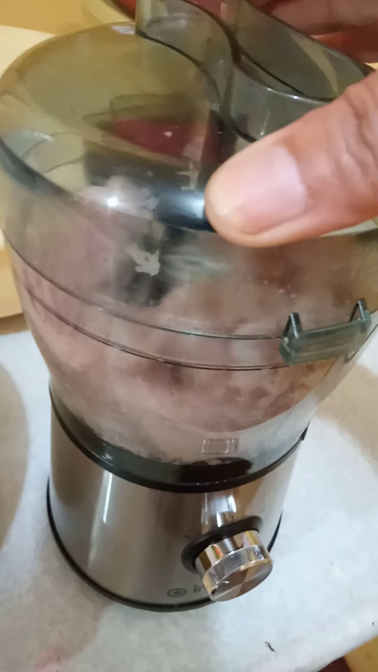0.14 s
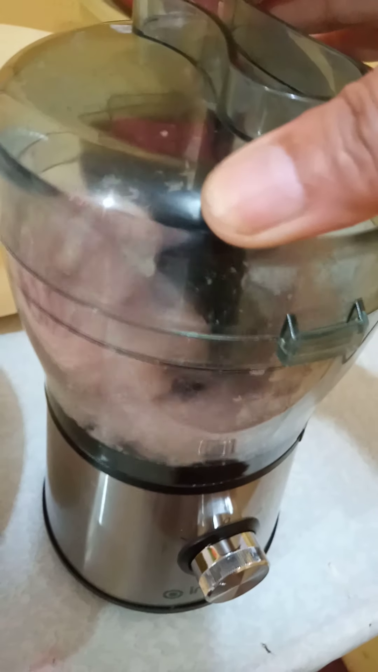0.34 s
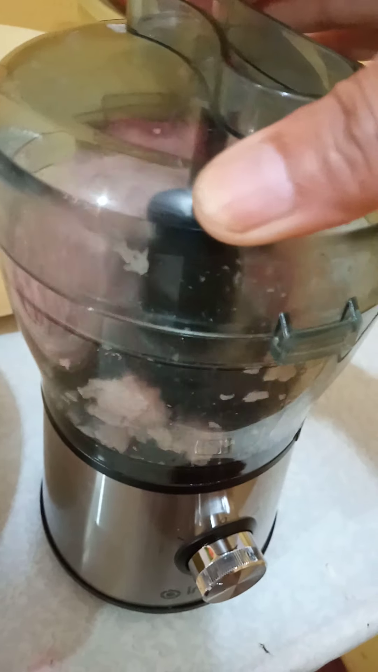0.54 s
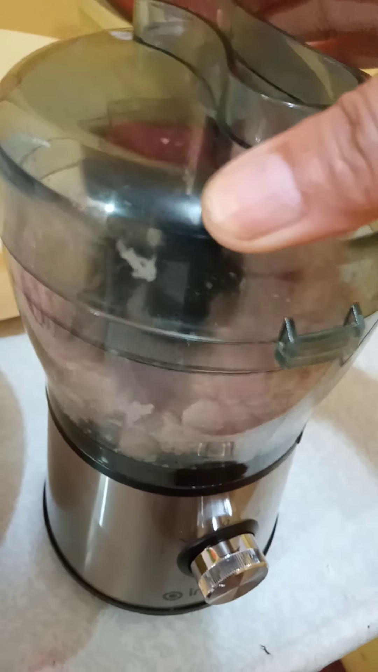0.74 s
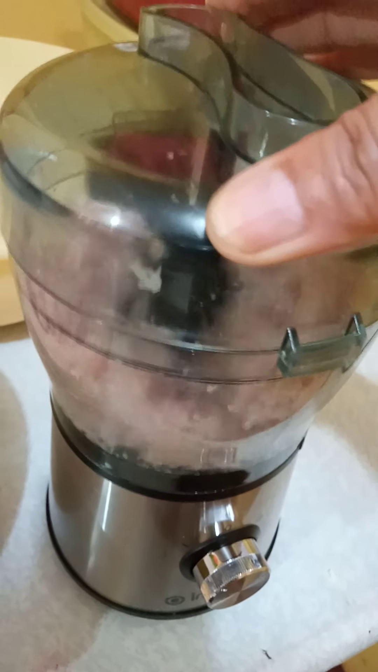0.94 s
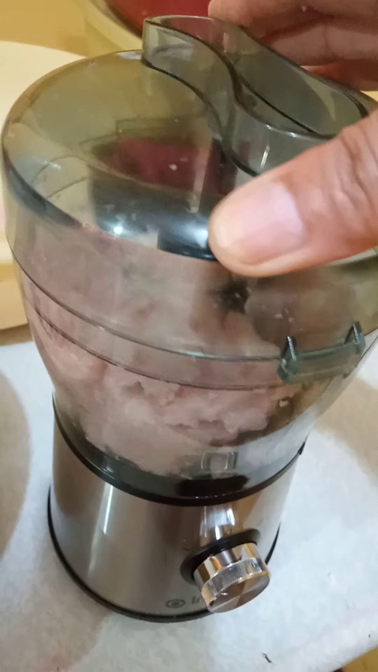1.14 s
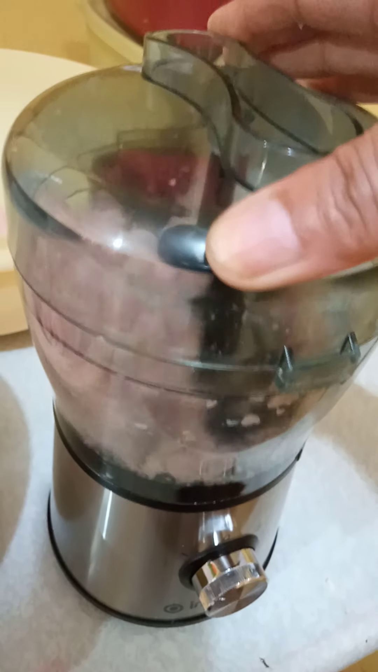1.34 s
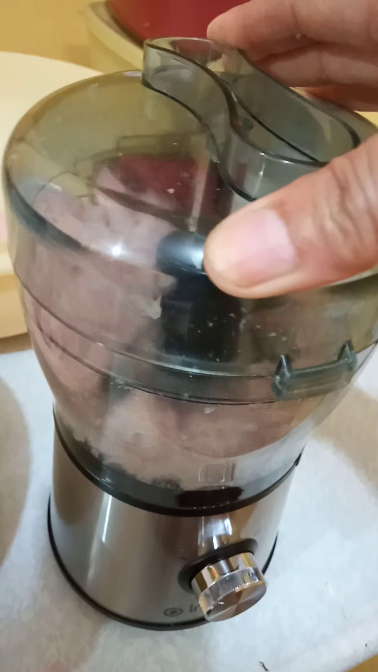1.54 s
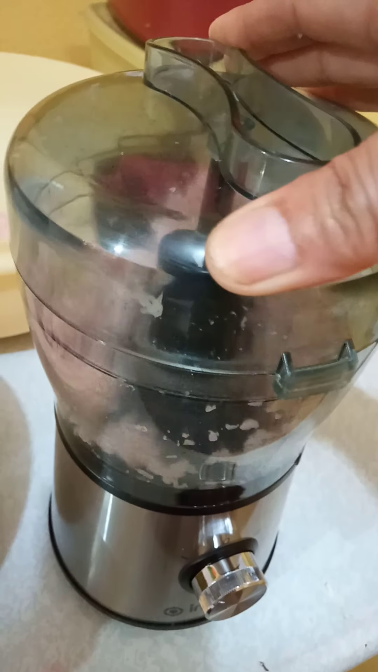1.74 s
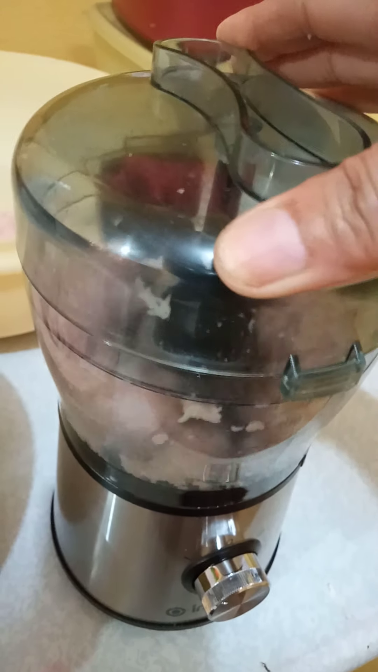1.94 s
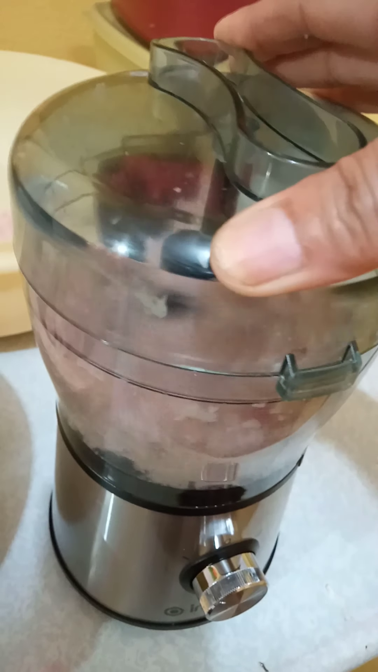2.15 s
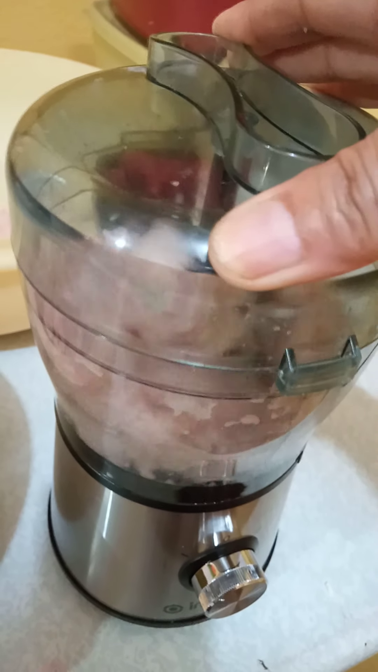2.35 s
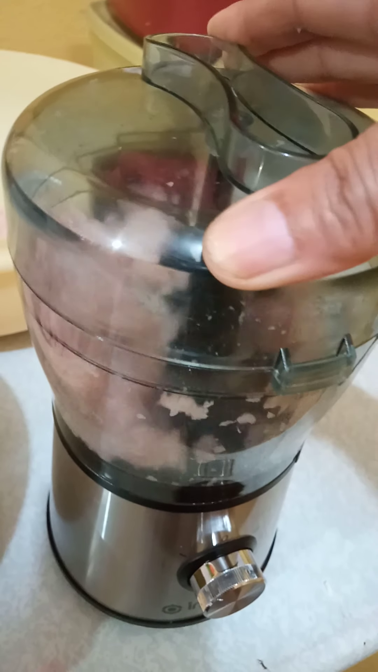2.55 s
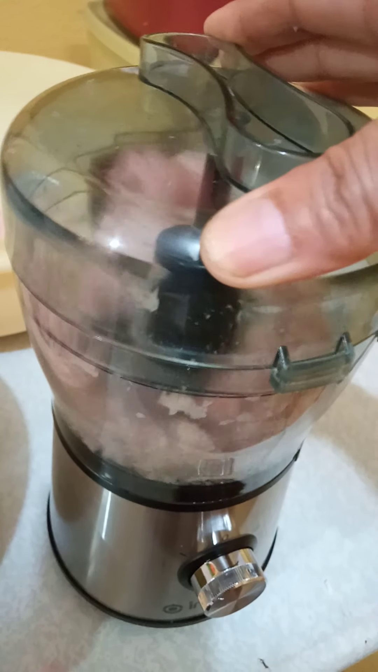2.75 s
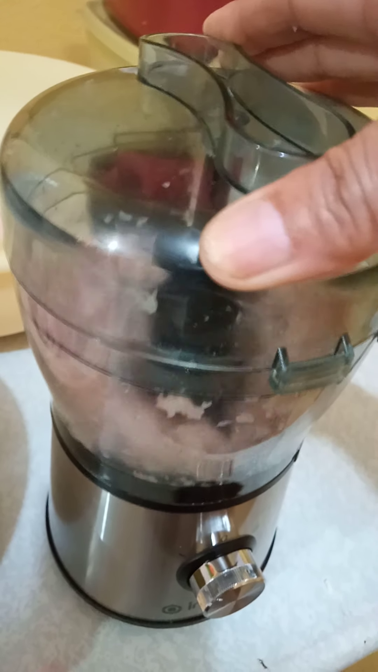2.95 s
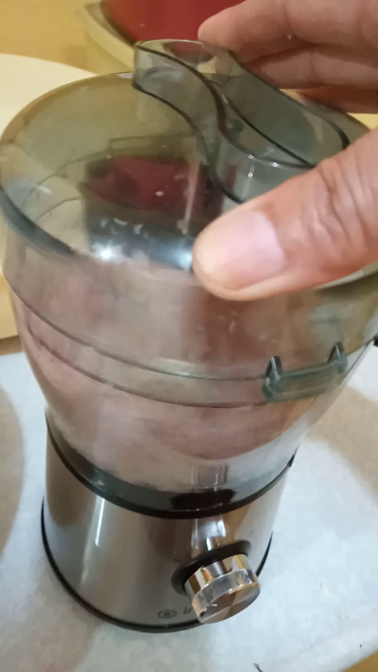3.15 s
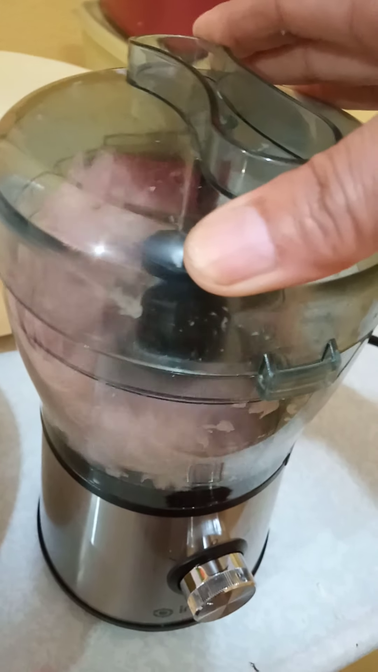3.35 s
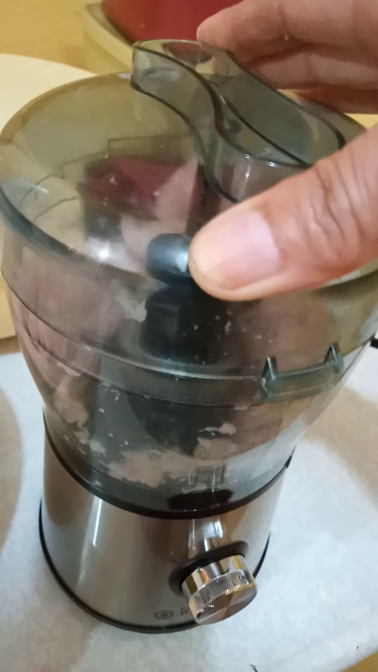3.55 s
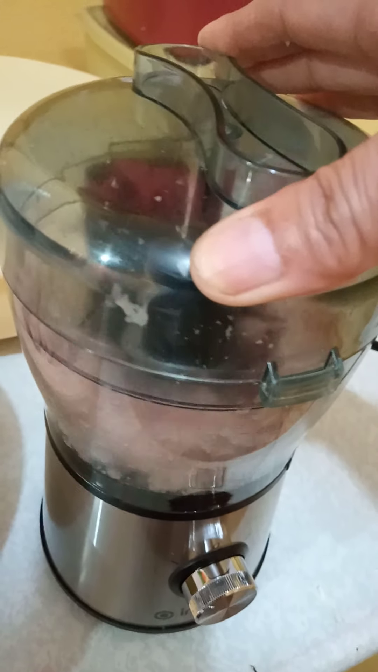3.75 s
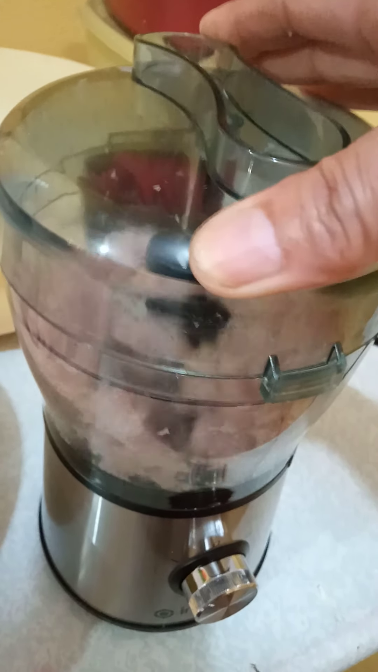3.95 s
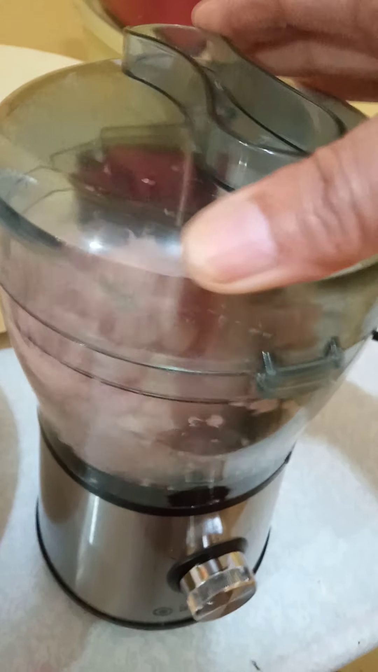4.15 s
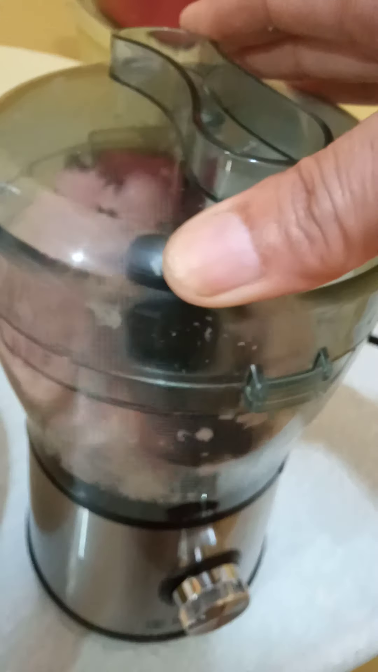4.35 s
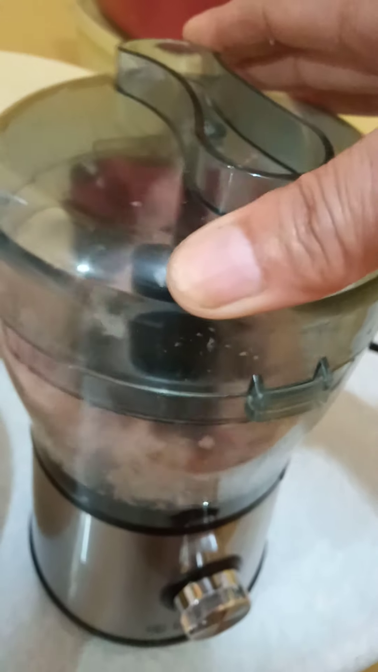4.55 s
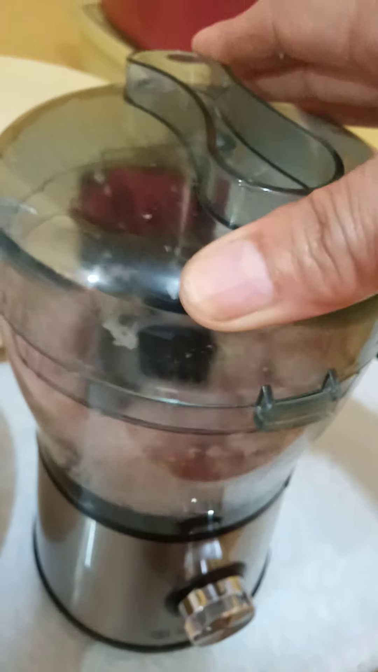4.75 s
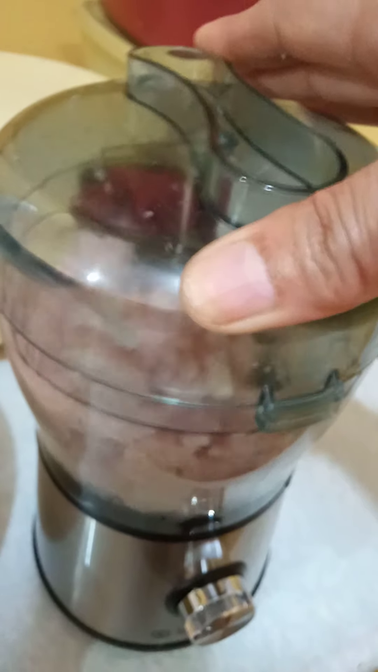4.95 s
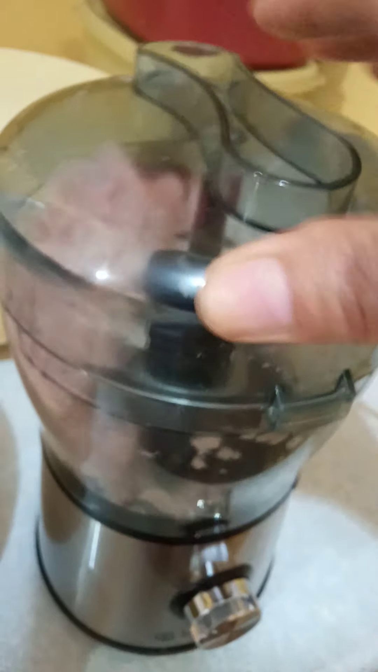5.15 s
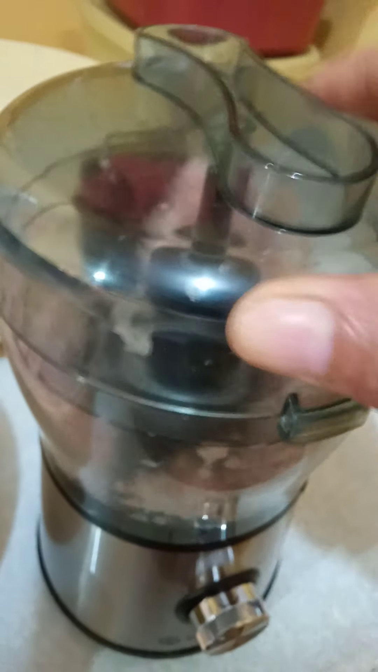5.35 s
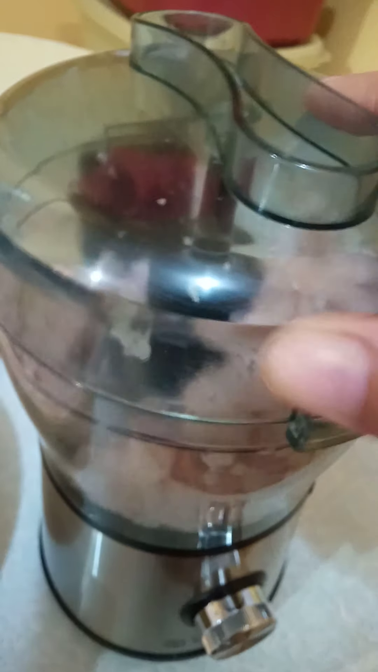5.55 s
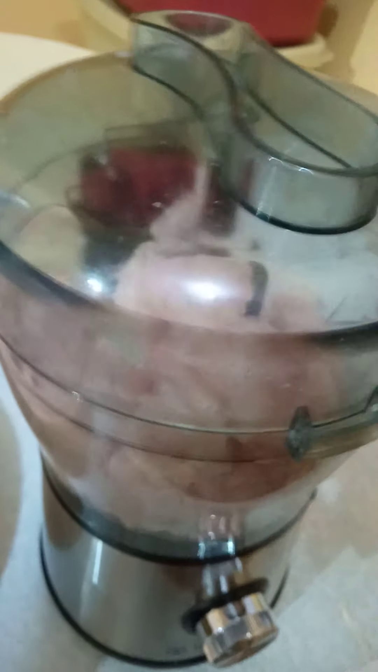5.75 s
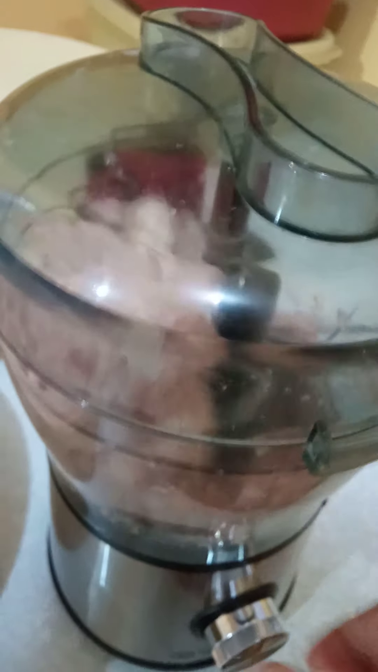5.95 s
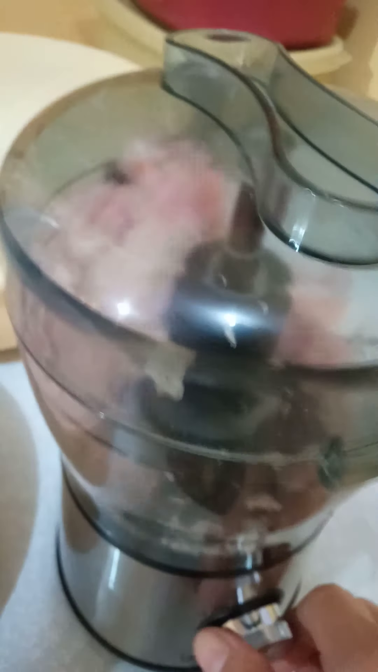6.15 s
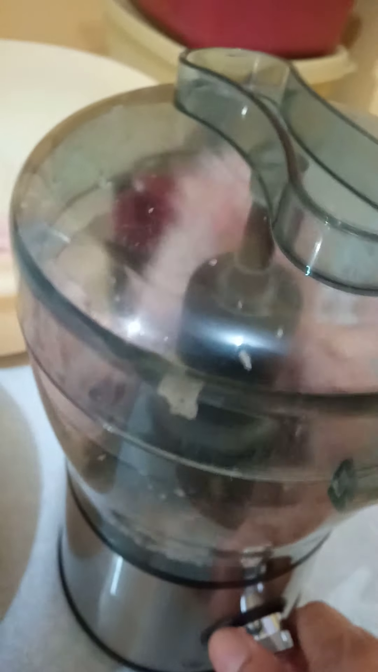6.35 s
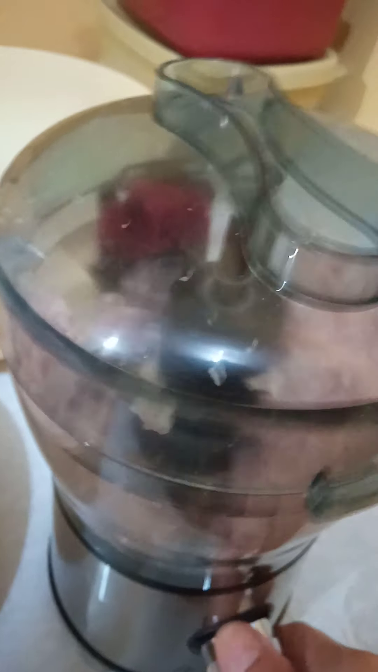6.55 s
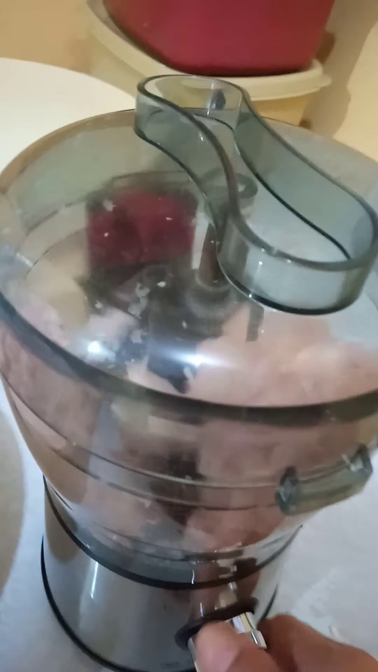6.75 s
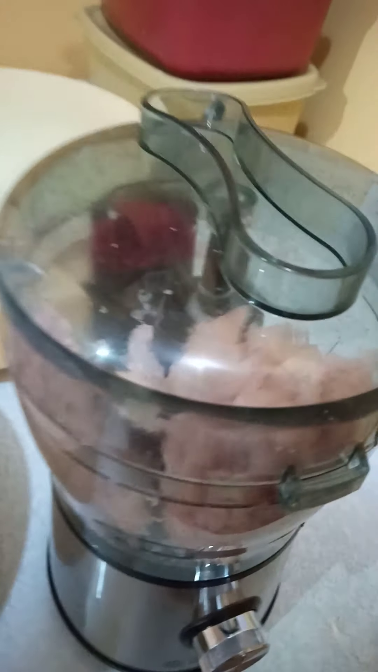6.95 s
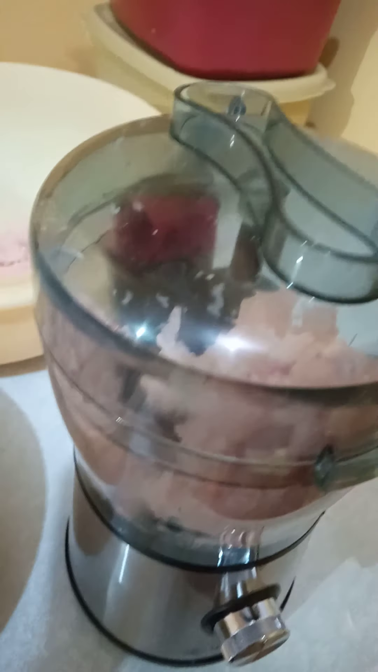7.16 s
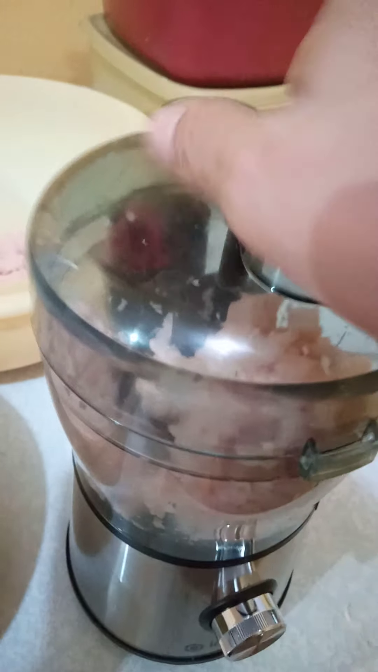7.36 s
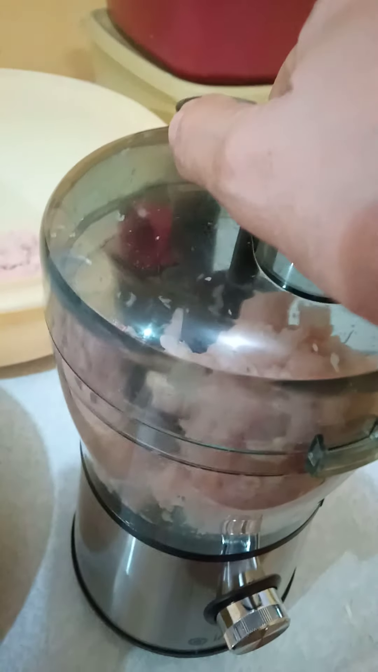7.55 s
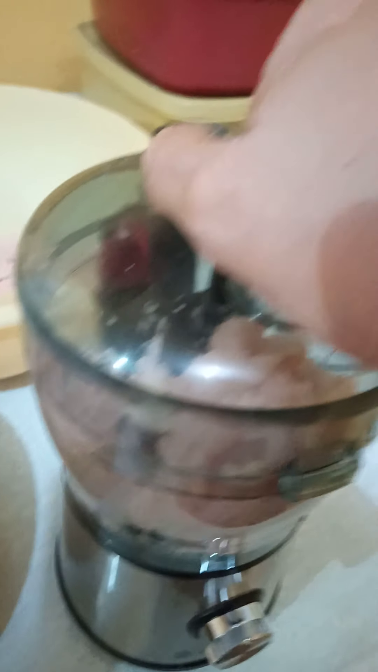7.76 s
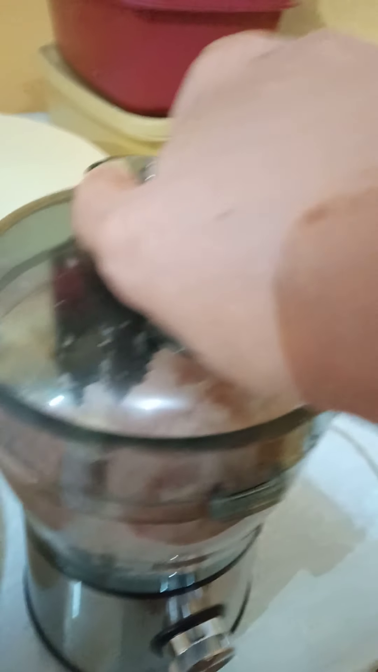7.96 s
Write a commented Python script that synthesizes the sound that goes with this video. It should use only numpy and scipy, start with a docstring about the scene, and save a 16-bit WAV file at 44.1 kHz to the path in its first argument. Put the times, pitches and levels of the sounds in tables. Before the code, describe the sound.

A food chopper whines and rasps as lumps of meat knock in its bowl, then coasts to a stop, followed by light plastic taps.

```python
"""Electric chopper mincing meat

A chopper minces raw meat on a kitchen counter, then is switched off and coasts to rest.
Its gear teeth whine and rasp through the plastic housing, throbbing with each turn of the blades.
The meat churns and lumps knock on the bowl. Afterwards a hand brushes and taps the lid,
over quiet room air and a faint steady hum."""
import sys
import numpy as np
from scipy import signal
from scipy.fft import rfft, irfft
from scipy.io import wavfile
from scipy.ndimage import uniform_filter1d, minimum_filter1d

SR = 44100
rng = np.random.default_rng(int(sys.argv[2]) if len(sys.argv) > 2 else 0)


def digitize_waveform(pressure):
    """Quantize a signal to 16-bit integers and store it at the path in sys.argv[1].

    Rows of a 2-D input are taken as channels; values are limited to [-1, 1].
    """
    field = np.atleast_2d(pressure).T
    bounded = np.clip(field, -1, 1)
    quanta = np.round(bounded * 32767).astype(np.int16)
    wavfile.write(sys.argv[1], SR, quanta)


N = 352344
TIME, BINS_HZ = np.arange(N) / SR, np.fft.rfftfreq(N, 1 / SR)
WHEEL_TEETH, IDLER_TEETH = 92, 90  # the wheel turns with the blades; the idler is a second gear
OFF_S, UNLOAD_S, COAST_S = 6.42, .05, .665  # switch-off, then time for teeth to go slack and to stop


# How well the plastic housing passes each pitch: pitch_hz, level_db
HOUSING_TONE = [(100, -34.5), (500, -19.5), (850, -12), (1150, -13), (1550, -3), (2550, -8.5), (3000, -2),
                (3500, 0.5), (4300, -6), (4640, -7.5), (4850, -22), (6000, -31.5), (8600, -41), (9800, -53),
                (15500, -70)]
# Pitches at which the housing rings: pitch_hz, width_hz, boost_db
HOUSING_RINGS = [(724.8, 33, 12.5), (1365, 23, 6.5), (1889.6, 135, 9.5), (2245, 90, 9), (3503, 44, 5),
                 (3670, 430, 5), (4450, 320, 0), (5300, 260, 8.5), (7310, 260, 7.5), (8230, 380, 10)]
def gears():
    """The whole drive: gear teeth rasp and whine while the motor's brushes fizz."""
    mesh_hz = mesh_rate()
    rasp_db, low_db, high_db = gear_levels(mesh_hz)
    teeth = np.cumsum(mesh_hz * (1 + .002 * drift(30))) / SR  # count of teeth that have met
    turns = teeth / WHEEL_TEETH
    housing = response(HOUSING_TONE, HOUSING_RINGS)
    coasting = np.clip(1.3 * (1 - mesh_hz / 1780), 0, 1)  # 0 at full speed, 1 when slow
    sound = amp(rasp_db) * rasp(teeth, turns, housing, coasting)
    # play between the teeth shakes their timing and blurs each tone, most under power
    looseness = np.interp(TIME, [6.4, 6.5], [1, .55])
    phase = 2 * np.pi * teeth + looseness * (.45 * drift(70) + .3 * np.sin(2 * np.pi * turns))
    sound += whines(phase, teeth, turns, low_db, high_db)
    sound += amp(rasp_db) * overtones(phase, turns, housing)
    sound += amp(rasp_db) * motor_brushes(turns, coasting)
    return sound * np.interp(TIME, [6.92, 7.03, 7.12], [1, .65, 0])


# Running speed, sagging and recovering with the load of meat: time_s, mesh_hz
GEAR_SPEED = [(0, 1845), (.5, 1790), (1.1, 1815), (1.8, 1820), (2.6, 1790), (3.25, 1792), (3.75, 1850),
              (4.35, 1842), (4.9, 1805), (5.25, 1840), (5.65, 1797), (6, 1865), (6.42, 1900)]
def mesh_rate(drag=.21):
    """How many teeth meet each second; after switch-off, friction and drag brake them to rest."""
    slowed = since_off(COAST_S)
    return curve(GEAR_SPEED) * (1 - slowed) * (1 - drag * slowed)


# How hard the gears are driven: time_s, level_db
GEAR_EFFORT = [(0, 0.1), (1.2, -.2), (2.6, -0.66), (4.1, 1.03), (4.75, -0.1), (5.1, 1.5), (5.65, 2),
               (6.42, -0.25)]
def gear_levels(mesh_hz):
    """Rasp and whines follow effort and speed; a whine swells where the housing rings."""
    slack, churn_db = since_off(UNLOAD_S), curve(CHURN_LEVEL)
    fade_db = 4.5 * np.log2(np.minimum((mesh_hz + 1) / 710, 1))  # quieter below 710 Hz
    shudder_db = 5 * np.exp(-((mesh_hz - 660) / 47) ** 2)  # the drive shudders passing 660 Hz
    drive_db = curve(GEAR_EFFORT) + fade_db + shudder_db
    strain_db = .3 * (churn_db - churn_db[0]) * (1 - slack)  # tumbling lumps strain the gears
    rasp_db = drive_db - 24.5 - 1.5 * slack
    low_db = drive_db - 26.5 + strain_db + .5 * slack + tone_db(HOUSING_TONE, mesh_hz, HOUSING_RINGS)
    high_db = drive_db - 22.5 - 5.5 * slack + tone_db(HOUSING_TONE, 2 * mesh_hz, HOUSING_RINGS)
    return rasp_db, low_db, high_db


# The housing's tone when the teeth meet slowly: pitch_hz, level_db
COAST_TONE = [(100, -33.5), (700, -3.5), (1200, -7.5), (1900, -0.5), (2450, -3.5), (2750, 0.5), (3100, 0),
              (4500, -7), (5200, -31), (9000, -54), (15000, -72)]
def rasp(teeth, turns, housing, coasting):
    """Uneven tooth hits shake the housing; slow teeth strike softly and miss its sharp rings."""
    load = throb(turns, lead_turns=.18, once_db=0, twice_db=1.5, four_db=1, flutter_db=0)
    hits = load * (.49 + np.exp(-(teeth % 1) / .25)) * rng.standard_normal(N)
    hard = unit(through(hits, housing)) * amp(4.5)
    soft = unit(through(load * rng.standard_normal(N), response(COAST_TONE)))
    return (1 - coasting) * hard + np.sqrt(coasting) * soft


def whines(phase, teeth, turns, low_db, high_db):
    """Meeting teeth sing two throbbing tones: one just above the mesh rate, one at twice that rate."""
    wheel = throb(turns, lead_turns=.18, once_db=6, twice_db=2.6, four_db=1.2, flutter_db=2.2)
    idler = throb(teeth / IDLER_TEETH, lead_turns=.3, once_db=3.7, twice_db=2.8, four_db=2.6,
                  flutter_db=2.9)
    low = amp(low_db) * wheel * np.cos(phase + 4 * np.pi * turns + .9 * drift(60))
    high = blade_bites(amp(high_db) * idler) * np.cos(2 * phase)
    return low + high


def throb(turns, lead_turns, once_db, twice_db, four_db, flutter_db):
    """An off-centre wheel swings the load once, twice and four times a turn, never quite alike."""
    swing_db = once_db * np.cos(2 * np.pi * (turns + lead_turns))
    for per_turn, depth_db in ((2, twice_db), (4, four_db)):
        swing_db += depth_db * np.cos(2 * np.pi * (per_turn * turns + rng.random() + .29 * drift(.97)))
    flutter_band = signal.butter(2, [15, 99], "band", fs=SR, output="sos")
    swing_db += flutter_db * unit(signal.sosfilt(flutter_band, rng.standard_normal(N)))
    return unit(amp(np.minimum(swing_db, 6)))


# Brief gear squeals as a blade bites: time_s, peak_db
BLADE_BITES = [(.176, -7), (1.717, -6), (2.32, -6), (2.372, -4), (2.467, -8), (2.521, -8), (3.419, -6),
               (4.399, -8.5), (4.5, -8), (5.636, -6.5)]
def blade_bites(level):
    """The teeth go slack around each bite, then take its load for a few milliseconds."""
    for time_s, peak_db in BLADE_BITES:
        slack = np.exp(-((TIME - time_s) / .011) ** 2)
        bite = np.exp(-((TIME - time_s) / .0042) ** 2)
        level = level * (1 - slack) + amp(peak_db) * bite
    return level


def overtones(phase, turns, housing):
    """Higher gear tones pulse with each turn, then flare as they slide down past the housing's rings."""
    slack = since_off(UNLOAD_S)
    pulse_db = 6 * (1 - slack) * np.sin(2 * np.pi * turns)
    tones = np.zeros(N)
    for multiple, level_db in enumerate([5.5, .5, -2, -10, -11.5, -8.5], start=3):
        flicker = unit(amp(3.2 * drift(45) + pulse_db))
        tones += amp(level_db) * flicker * np.cos(multiple * phase)
    fade = np.interp(TIME, [6.84, 6.92], [1, .12])
    return through(tones, housing) * amp(-6.5 + 2 * slack) * fade


# The fizz of the motor's sliding contacts: pitch_hz, level_db
FIZZ_TONE = [(3000, -13.5), (5300, -6.5), (6300, 2.5), (6850, -6), (7300, -15.5), (7800, -18), (8250, -4.5),
             (9000, -16.5), (9900, -28), (11300, -22), (12500, -31.5), (15500, -29)]
def motor_brushes(turns, coasting):
    """The brushes make a thin hiss that wavers with each turn and drops as the motor slows."""
    rattle_db = 2 * np.sin(2 * np.pi * turns) + .9 * drift(40)
    return noise(FIZZ_TONE) * amp(-30 - 8.4 * coasting + rattle_db)


# Meat tumbling in the bowl: pitch_hz, level_db
CHURN_TONE = [(25, -48), (55, -25), (78, -8.5), (95, -10.5), (130, -6.5), (230, 1.5), (325, -7), (385, 0),
              (480, -15), (700, -7.5), (1300, -16.5), (4000, -64)]
# The churning swells as a large lump tumbles round: time_s, level_db
CHURN_LEVEL = [(0, -35), (4.8, -35.5), (5.25, -31), (5.5, -32), (5.85, -34), (6.05, -31), (6.45, -27.5)]
def meat():
    """Mince churns with a low rumble, hits the bowl, and settles after switch-off."""
    churn_db = curve(CHURN_LEVEL) - 13.5 * since_off(.27)
    churn = amp(churn_db - 2) * noise(CHURN_TONE) * unit(amp(2.4 * drift(50)))
    return churn * np.interp(TIME, [6.7, 7.05], [1, 0]) + bowl_hits(churn_db)


# The thud of the struck bowl: pitch_hz, level_db
BOWL_TONE = [(25, -48), (60, -23), (140, -2), (300, -1.5), (500, -7), (750, 3), (1150, 1), (1600, -4.5),
             (3000, -12), (4500, -17), (6000, -33), (9000, -51.5), (15000, -73.5)]
# The bright snap of a hit: pitch_hz, level_db
SNAP_TONE = [(2000, -21.5), (6000, -3.5), (8200, 3.5), (9800, -16), (11500, -4.5), (15500, -18)]
# Large lumps hitting the bowl, some one blade turn apart: start_s, thud_db, snap_db
BIG_KNOCKS = [(.613, -8, -50), (1.196, -12, -58), (1.348, -13, -57), (3.565, -11.5, -52), (4.286, -15, -52),
              (4.481, -12, -40), (5.129, -12, -47), (5.18, -10.5, -52), (5.231, -8, -27),
              (5.281, -9.5, -49), (5.332, -10, -51), (5.957, -9.5, -49), (6.006, -8.5, -28),
              (6.057, -7, -28), (6.155, -6.5, -53), (6.204, -11, -56), (6.254, -10, -45),
              (6.299, -6.5, -35)]
def bowl_hits(churn_db, scraps_per_s=25, lump_chance=.12):
    """The blades fling meat at the bowl: big lumps knock, small ones patter and scraps tick."""
    bowl, snap = response(BOWL_TONE), response(SNAP_TONE)
    knocks = np.zeros(N)
    for start_s, thud_db, snap_db in BIG_KNOCKS:
        add(knocks, start_s, amp(thud_db + 3.5) * strike(bowl, rattle=.038, decay_s=.016))
        add(knocks, start_s, amp(snap_db) * strike(snap, rattle=.06, decay_s=.002))
    scraps = rng.random(N) < scraps_per_s / SR
    size_db = 4 * np.minimum(rng.exponential(1, N), 4)
    ticks = through(scraps * amp(churn_db + size_db - 21) * (TIME < 6.8), snap)
    turns = np.cumsum(mesh_rate()) / SR / WHEEL_TEETH
    blade_passes = np.diff(np.floor(2 * turns), prepend=0)  # two blades
    lumps = blade_passes * (rng.random(N) < lump_chance) * (TIME < OFF_S)
    patter = through(lumps * amp(churn_db + 14), strike(bowl, rattle=.047, decay_s=.014))
    return knocks + patter + ticks


# A palm sliding on the lid: time_s, level_db
PALM_SLIDE = [(7.36, -75), (7.43, -47), (7.48, -47), (7.52, -52), (7.56, -47.5), (7.63, -61.5), (7.7, -70)]
# The tapped plastic lid: pitch_hz, level_db
LID_TONE = [(300, -24), (1200, 0), (2000, 2), (3000, 6), (4300, -4), (5300, -20), (8000, -32), (15000, -58)]
# Finger taps, with thump and tick added to the tap's level: start_s, level_db, thump_db, tick_db
FINGER_TAPS = [(7.2955, -35, -18, -35), (7.4464, -38, -14, -29), (7.456, -35, -19, -34),
               (7.468, -32.5, -19, -27), (7.478, -29, -14, -26), (7.4877, -32, -11, -32),
               (7.5337, -30, -15, -18), (7.871, -43.5, -10.5, -18), (7.9555, -31, 0.5, -33)]
def hand():
    """A palm brushes the lid; each finger tap gives a clack, a low thump and a bright tick."""
    rub = noise([(40, -14), (150, 5.5), (500, -2), (1500, -7.5), (4000, -10), (5300, -33.5),
                 (15000, -59.5)])
    sound = amp(curve(PALM_SLIDE)) * rub
    lid = response(LID_TONE)
    thump = response([(80, -5), (500, -8), (900, -3), (1400, -5), (3000, -32), (9000, -60)])
    tick = response([(2000, -30), (6000, 2), (8500, -1), (12000, -25)])
    for start_s, level_db, thump_db, tick_db in FINGER_TAPS:
        add(sound, start_s, amp(level_db + 1) * strike(lid, rattle=.17, decay_s=.005))
        add(sound, start_s, amp(level_db + thump_db) * strike(thump, rattle=.12, decay_s=.008))
        add(sound, start_s, amp(level_db + tick_db + 5) * strike(tick, rattle=.2, decay_s=.0022))
    return sound


def kitchen(sound, echo_s, echo_db):
    """The counter and walls add a dense, short echo."""
    t = np.arange(SR // 2) / SR
    tail = rng.standard_normal(len(t)) * amp(-60 * t / echo_s) * (t > .003)
    return sound + amp(echo_db) * through(sound, tail / np.linalg.norm(tail))


# The tones of a humming appliance: pitch_hz, level_db
HUM_TONES = [(662.1, -64.5), (780.6, -60.5), (1378, -73), (1739, -71), (2218, -74)]
# The quiet room: pitch_hz, level_db
AIR_TONE = [(20, -43.5), (45, -16), (70, 0.5), (95, -4), (130, -7), (260, -8.5), (450, -12.5), (600, -18),
            (1100, -21.5), (2600, -21), (3900, -28), (5500, -53), (6500, -54.5), (7600, -47),
            (12000, -59.5)]
def background():
    """Still room air and a steady appliance hum."""
    hum = np.zeros(N)
    for pitch_hz, level_db in HUM_TONES:
        phase = 2 * np.pi * (pitch_hz * TIME + rng.random()) + .14 * drift(4)
        hum += amp(level_db + 7) * np.sin(phase)
    return amp(-50.5) * noise(AIR_TONE) + hum


def amp(db):
    """Turns decibels into a multiplier."""
    return 10 ** (np.asarray(db) / 20)


def unit(x):
    """Scales a signal to an average power of 1."""
    return x / np.sqrt(np.mean(x ** 2) + 1e-20)


def curve(rows):
    """Joins (time_s, value) points with straight lines."""
    return np.interp(TIME, *np.transpose(rows))


def since_off(length_s):
    """Rises from 0 at switch-off to 1 after the given time."""
    return np.clip((TIME - OFF_S) / length_s, 0, 1)


def tone_db(tone, hz, rings=()):
    """Level at each pitch: a broad outline of (pitch_hz, level_db) points plus ringing peaks."""
    pitches_hz, levels_db = np.transpose(tone)
    outline_db = np.interp(np.log(hz + 1), np.log(pitches_hz), levels_db)
    return outline_db + sum(db / (1 + (2 * (hz - pitch) / width) ** 2) for pitch, width, db in rings)


def noise(tone):
    """Noise shaped to the given tone."""
    return unit(irfft(rfft(rng.standard_normal(N)) * amp(tone_db(tone, BINS_HZ)), N))


def drift(rate_hz):
    """A random wobble, up to about the given rate."""
    return unit(irfft(rfft(rng.standard_normal(N)) / (1 + (BINS_HZ / rate_hz) ** 4), N))


def response(tone, rings=(), size=4096):
    """How an object with this tone answers a single click."""
    log_gain = np.log(amp(tone_db(tone, abs(np.fft.fftfreq(size, 1 / SR)), rings)))
    spectrum = np.exp(np.conj(signal.hilbert(log_gain)))  # puts the ringing after the click
    return np.fft.ifft(spectrum).real[:size // 2]


def through(sound, body):
    """Lets a sound ring through an object."""
    return signal.oaconvolve(sound, body)[:len(sound)]


def strike(body, rattle, decay_s, size=4096):
    """A sharp hit and its dying rattle sound through an object, scaled to a peak of 1."""
    force = rattle * rng.standard_normal(size) * np.exp(-np.arange(size) / SR / decay_s)
    force[0] += 1
    sound = through(force, body)
    return sound / abs(sound).max()


def add(mix, start_s, sound):
    """Mixes a sound in at the given time."""
    part = mix[max(round(start_s * SR), 0):][:len(sound)]
    part += sound[:len(part)]


def scene():
    """The chopper and the hand in the kitchen, in one channel."""
    return (kitchen(gears() + meat() + hand(), echo_s=.27, echo_db=-15) + background())[None]


def record(dry, ceiling=.85, cutoff_hz=15500):
    """Briefly turns down the loudest peaks, then cuts the highest treble."""
    needed_gain = np.minimum(1, ceiling / (abs(dry) + 1e-9))
    smooth_gain = uniform_filter1d(minimum_filter1d(needed_gain, size=129), size=129)
    treble_cut = signal.firwin(511, cutoff_hz, window=("kaiser", 9), fs=SR)
    return signal.oaconvolve(dry * smooth_gain, treble_cut[None], "same")


dry = scene()
out = record(dry)
digitize_waveform(out)
```